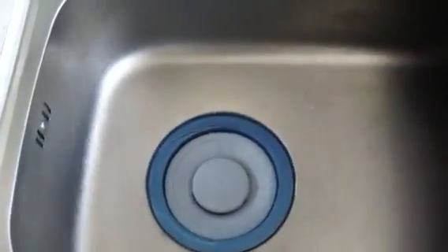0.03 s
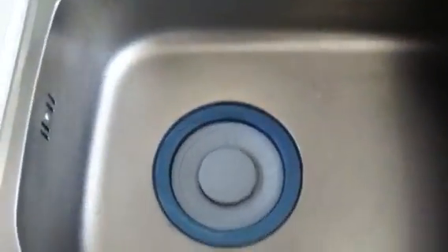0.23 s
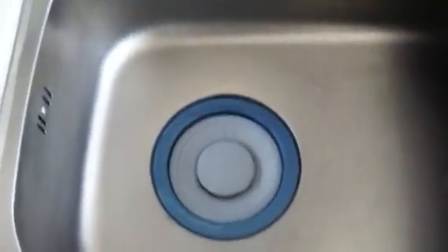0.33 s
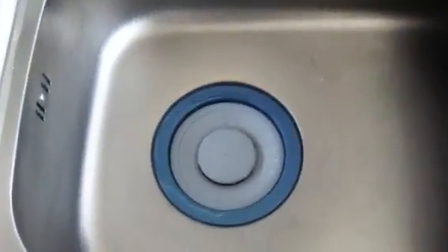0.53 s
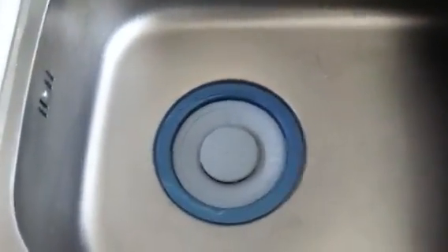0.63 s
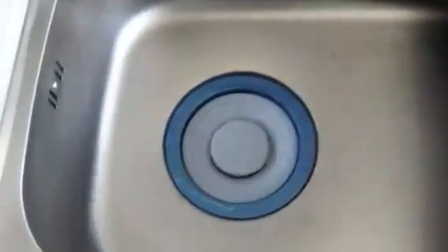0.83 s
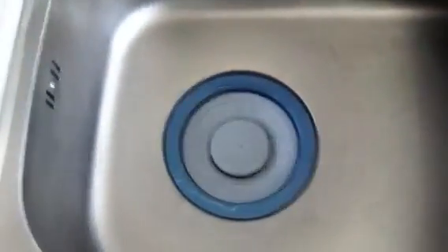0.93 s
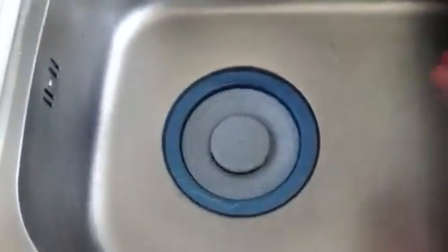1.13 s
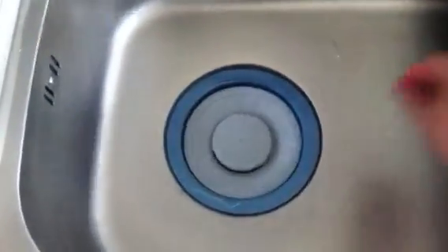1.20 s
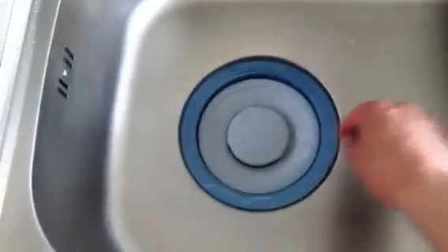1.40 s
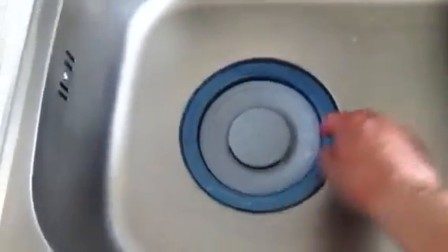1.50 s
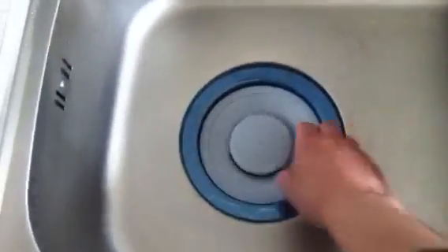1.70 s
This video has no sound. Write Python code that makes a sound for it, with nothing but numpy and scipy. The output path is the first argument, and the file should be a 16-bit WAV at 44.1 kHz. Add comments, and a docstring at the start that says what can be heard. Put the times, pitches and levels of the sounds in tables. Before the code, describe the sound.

A hard object hits a stainless steel sink with one loud clank at about 0.2 seconds. From 0.4 seconds it bounces in a quick, softer rattle, settling by about 0.75 seconds. The basin and the object ring briefly, fading by around 1 second. A few very faint handling ticks follow until about 1.6 seconds. The microphone is close, with a low kitchen hum underneath.

```python
"""A stainless steel sink, struck by a dropped hard object: one loud clank, a bounce, a settling rattle.
Each blow sets the basin and the object ringing in clear modes, over a dense wash of panel modes
and kitchen reverberation. Faint handling ticks and a low room hum lie around it.
One microphone, close to the sink, in mono."""
import sys
import numpy as np
from scipy import signal
from scipy.fft import rfft, irfft
from scipy.io import wavfile

SR = 44100
rng = np.random.default_rng(int(sys.argv[2]) if len(sys.argv) > 2 else 0)


def unload_wav(signal):
    """Save mono or channel-first audio to the path in sys.argv[1] as 16-bit WAV at rate SR, clipped to [-1, 1]."""
    wavfile.write(
        sys.argv[1],
        SR,
        np.round(np.clip(np.atleast_2d(signal).T, -1, 1) * 32767).astype(np.int16),
    )


N = 77175
T = np.arange(N) / SR
CUTOFF_HZ = 15800
LN_1000 = np.log(1000)   # time constants in a 60 dB decay


def from_db(db):
    """Decibels to gain."""
    return 10 ** (np.asarray(db) / 20)


def unit_rms(x):
    """Scale to unit rms."""
    return x / np.sqrt(np.mean(x ** 2) + 1e-20)


def at_hz(points, hz, column=1):
    """Read one column of a table on a log-frequency axis."""
    table = np.array(points)
    return np.interp(np.log(hz), np.log(table[:, 0]), table[:, column])


def noise(gain_at):
    """Unit-rms noise whose spectrum follows a function of frequency."""
    hz = np.maximum(np.fft.rfftfreq(N, 1 / SR), 1)
    return unit_rms(irfft(rfft(rng.standard_normal(N)) * gain_at(hz), N))


def decay(start, rise, t60):
    """Envelope that rises quickly at the start time and dies exponentially."""
    age = np.maximum(T - start, 0)
    return (1 - np.exp(-age / max(rise, 1e-4))) * np.exp(-LN_1000 * age / t60)


def ring(clicks, hz, t60):
    """One damped mode: each click starts a dying sine."""
    radius = np.exp(-LN_1000 / (t60 * SR))
    angle = 2 * np.pi * hz / SR
    return signal.lfilter([0, np.sin(angle)], [1, -2 * radius * np.cos(angle), radius ** 2], clicks + 1e-18)


# Spectrum of the kitchen's background: f/Hz, relative level/dB
ROOM_SPECTRUM = [(18, -80.5), (30, -51.5), (173, -6), (249, -5), (284, -14), (315, -1), (561, -11.5),
                 (874, -19), (1020, -17), (1820, -24.5), (3880, -27.5), (4310, -26), (5040, -27.5),
                 (8950, -28), (15500, -28.5)]
# Tones of the hum: f/Hz, level/dB before the trim
HUM_TONES = [(177.6, -74), (247.6, -74.5), (323.0, -71), (409.1, -73)]

def room_tone(noise_db=-61, hum_trim_db=.5, waver_depth=.4):
    """The kitchen behind the sink: low noise, faint hiss and a wavering hum."""
    out = from_db(noise_db) * noise(lambda f: from_db(at_hz(ROOM_SPECTRUM, f)))
    for hz, db in HUM_TONES:
        waver = 1 + waver_depth * noise(lambda f: 1 / (1 + (f / 8) ** 2))
        tone = np.sqrt(2) * np.sin(2 * np.pi * (hz * T + rng.random()))
        out += from_db(db + hum_trim_db) * waver * tone
    return out


# Faint ticks, knocks and slides: t/s, level/dB, f/Hz, width/Hz, rise/s, t60/s, relative crack level/dB
HANDLING_TICKS = [(0.085, -50, 1030, 550, 0.00074, 0.24, -9), (0.086, -52, 526, 96, 0.0011, .1, -24),
                  (0.09, -62, 1898, 1100, 0.011, 1, -7), (0.965, -52, 9100, 620, .0005, 0.041, -7),
                  (0.944, -53, 116, 12, .02, .3, -27.5), (1.102, -65, 4180, 560, .004, .08, -15),
                  (1.15, -62, 6600, 500, .003, .06, -15), (1.222, -52.5, 4450, 320, 0.0055, 0.062, -11.5),
                  (1.332, -52.5, 8670, 1150, .0005, .09, 0), (1.333, -60.5, 1003, 110, .002, 0.13, -11),
                  (1.39, -63.5, 3570, 1500, .01, 0.15, -5), (1.455, -58, 4600, 1100, .01, 0.096, -12),
                  (1.518, -52, 1048, 120, 0.00083, 0.12, -27), (1.515, -66, 4300, 500, .003, .08, -12),
                  (1.583, -58, 4310, 460, .005, 0.067, -12), (1.603, -54, 12600, 4500, 0.0061, 0.12, -10)]

def handling_ticks():
    """Small contacts: each a noise burst in one resonance, with some broadband crack."""
    out = 0
    for start, db, centre, width, rise, t60, crack_db in HANDLING_TICKS:
        body = noise(lambda f: 1 / (1 + (2 * (f - centre) / width) ** 2))
        crack = noise(lambda f: f / centre / (1 + (f / centre) ** 2))
        out += from_db(db) * decay(start, rise, t60) * (body + from_db(crack_db) * crack)
    return out


# Blows of the object on the basin: t/s, level/dB, extra bass/dB, extra treble/dB,
# extra basin ring/dB, extra object ring/dB, crack level/dB, crack f/Hz
SINK_BLOWS = [(0.2243, -2, 2, -3, -22.5, -18, -28, 2020), (0.229, -1.5, -3.5, 2.5, 3, -9, -17, 12480),
              (0.409, -15.5, -5, 2.5, -3, -2, -33.5, 5900), (0.431, -18, 1, -10, 3, 3, -47, 4970),
              (0.460, -16, 4.5, -3, -7.5, -2, -39, 4000), (0.4953, -16, -1.5, -5.5, -11.5, -5, -29.5, 3500),
              (0.523, -19, 4.5, -7.5, -13, 2, -34.5, 3500), (0.567, -22, 4, -31, -9, 7.5, -44, 1200),
              (0.600, -31, 8, -32, -13, 9, -51, 1200), (0.645, -33.5, 10.5, -28, -2.5, 10, -60, 12000),
              (0.735, -49, 7, 1, 0, 12, -60.5, 5000)]

def blow_clicks(strengths):
    """One click per blow, to drive the resonances."""
    clicks = np.zeros(N)
    starts = np.array(SINK_BLOWS)[:, 0]
    np.add.at(clicks, (starts * SR).astype(int), strengths)
    return clicks


def blow_gains(hz, bass_hz=250, middle_hz=1300, treble_hz=6054):
    """How strongly each blow drives the given frequency."""
    return from_db([db + at_hz([(bass_hz, bass), (middle_hz, 0), (treble_hz, treble)], hz)
                    for _, db, bass, treble, *_ in SINK_BLOWS])


def contact_cracks(t60=.05):
    """The brief snap as the object meets the steel, heard from close by."""
    out = 0
    for start, *_, db, centre in SINK_BLOWS:
        snap = noise(lambda f: 1 / (1 + (f / centre - centre / f) ** 2))
        out += from_db(db) * decay(start, 0, t60) * snap
    return out


def basin_thump(db=-44.5, hz=40, length_s=.055):
    """The whole basin flexes under the first blow: a short, deep thump."""
    age = T - SINK_BLOWS[0][0]
    progress = np.clip(age / length_s, 0, 1)
    swell = np.sin(np.pi * np.sqrt(progress)) ** 2
    return from_db(db) * swell * np.sin(2 * np.pi * hz * age)


# Dense ring of the steel and the kitchen: f/Hz, relative level/dB per Hz, t60/s
DENSE_RING = [(45, -25, .2), (78, -20, .5), (117.7, -3.5, 0.99), (170, 0.5, 0.63), (240, 1.5, 0.61),
              (458, -0.5, 0.77), (800, -3.5, 0.63), (1200, -1, 0.61), (1800, 0.5, .45), (2400, -3.5, .46),
              (4500, -7.5, 0.47), (8000, -9, 0.3), (12530, -9, .28), (16000, -15, .25)]

def wash(bands=30, level_db=-53.5, build_s=.0015):
    """Overlapping modes and kitchen echoes merge into noise that dies faster in the treble."""
    edges = np.geomspace(35, 17000, bands + 1)
    build_pole = np.exp(-1 / (build_s * SR))
    out = 0
    for low, high in zip(edges, edges[1:]):
        hz = np.sqrt(low * high)
        decay_pole = np.exp(-2 * LN_1000 / (at_hz(DENSE_RING, hz, column=2) * SR))
        energy = blow_clicks(blow_gains(hz) ** 2) + 1e-18
        power = signal.lfilter([1 - build_pole], np.poly([decay_pole, build_pole]), energy)
        band = noise(lambda f: (f >= low) & (f < high))
        out += band * np.sqrt(power * (high - low)) * from_db(level_db + at_hz(DENSE_RING, hz))
    return out


def panel_modes(count=340, level_db=-56, spread_db=1.5):
    """Many weak modes of the thin steel, struck with new strengths by every blow."""
    edges = np.linspace(np.sqrt(600), np.sqrt(CUTOFF_HZ), count + 1) ** 2
    widths = np.diff(edges)
    pitches = edges[:-1] + widths * rng.random(count)
    scatter = unit_rms(from_db(spread_db * rng.uniform(-2.4, 2, count)))
    sizes = scatter * np.sqrt(2 * widths)   # each mode carries the power of its band
    couplings = rng.standard_normal((len(SINK_BLOWS), count))
    out = 0
    for hz, size, coupling in zip(pitches, sizes, couplings.T):
        gain = size * from_db(level_db + at_hz(DENSE_RING, hz))
        clicks = blow_clicks(blow_gains(hz) * coupling)
        out += gain * ring(clicks, hz, t60=at_hz(DENSE_RING, hz, column=2))
    return out


def clear_modes(modes, drive_db, build_s=.0057, rest_s=.53, damping_db_per_s=35.5):
    """A pitched ring; each mode takes a moment to build and is damped as the object comes to rest."""
    out = 0
    for hz, db, t60 in modes:
        clicks = blow_clicks(blow_gains(hz) * from_db(db + drive_db))
        out += ring(clicks, hz, t60) - ring(clicks, hz, build_s * LN_1000)
    return out * from_db(-damping_db_per_s * np.maximum(T - rest_s, 0))


# Clear modes of the basin: f/Hz, level/dB relative to the drive, t60/s before damping
BASIN_MODES = [(228.5, -30.5, .7), (254.2, -31, 1), (297.7, -29, .5), (410, -32, .5), (480.3, -31.5, 0.57),
               (534.4, -23, 1), (737, -32, 0.94), (783, -31, .55), (881, -30, .55), (1040, -28.5, .5),
               (1105, -29, 0.72), (1376, -32.5, 0.502), (1523, -23.5, .38), (1546, -28, 0.44),
               (1605, -29, 0.33), (1628, -25, .45), (1734, -27, .45), (1860, -25.5, .45), (1896, -29.5, .4),
               (1992, -30, 0.4), (2630, -34.5, .45), (2776, -30, .45), (3017, -32, .4), (3193, -30, .35),
               (3468, -35, 0.73), (4936, -34, .4), (7360, -43.5, 0.4), (12150, -33.5, .28)]

def basin_ring():
    """The steel basin rings under each blow."""
    return clear_modes(BASIN_MODES, drive_db=np.array(SINK_BLOWS)[:, 4])


# Clear modes of the dropped object: f/Hz, level/dB relative to the drive, t60/s before damping
OBJECT_MODES = [(1023, -27, .5), (1084, -24, .5), (1094, -24, .5), (1270, -24.5, .6), (1490, -33, 0.45),
                (1683, -34, 1.1), (1752, -28.5, .55), (1850, -30, 0.54), (1942.5, -25.5, .4),
                (2552.5, -27, 0.35), (3900, -34, 0.34), (4810, -30, .3)]

def object_ring():
    """The object's own ring, which stands out as it rattles."""
    return clear_modes(OBJECT_MODES, drive_db=np.array(SINK_BLOWS)[:, 5])


def scene():
    """Sink and kitchen at one close microphone, alike in both channels."""
    mono = room_tone() + wash() + panel_modes() + basin_ring() + object_ring()
    mono += contact_cracks() + basin_thump() + handling_ticks()
    return np.array([mono, mono])


def record(dry):
    """A steep low-pass after the microphone cuts the very top."""
    return signal.sosfilt(signal.ellip(10, .2, 70, CUTOFF_HZ, fs=SR, output="sos"), dry)


dry = scene()
out = record(dry)
unload_wav(out)
```